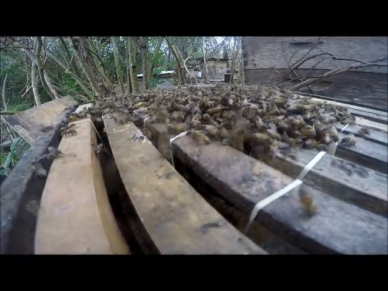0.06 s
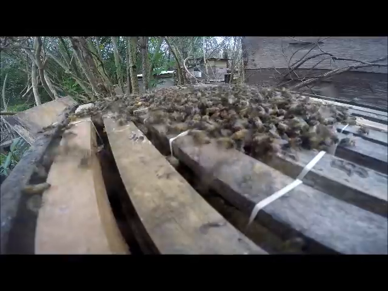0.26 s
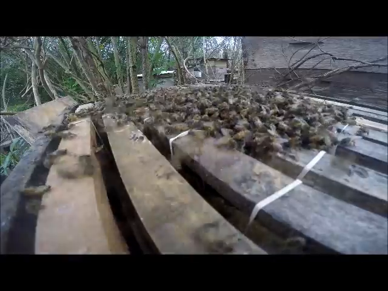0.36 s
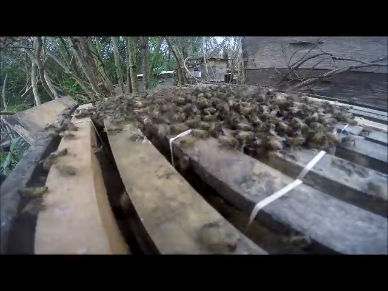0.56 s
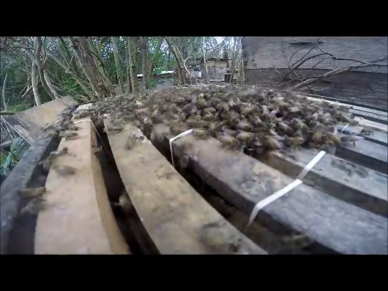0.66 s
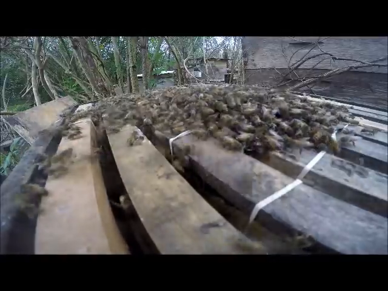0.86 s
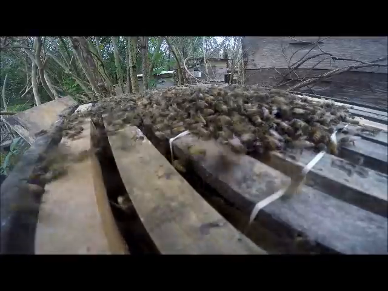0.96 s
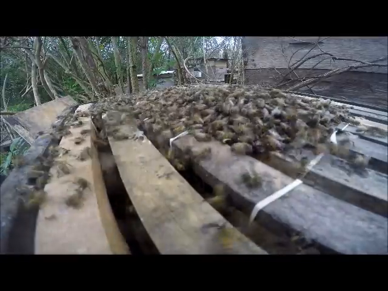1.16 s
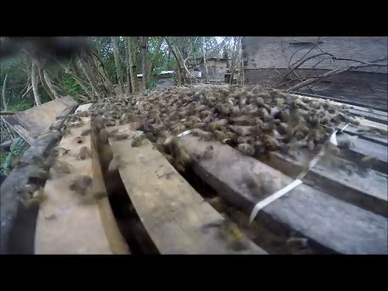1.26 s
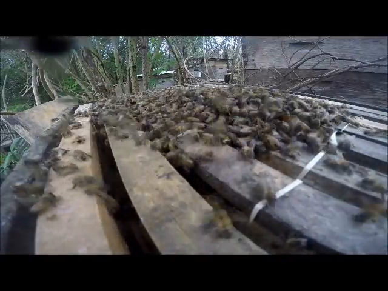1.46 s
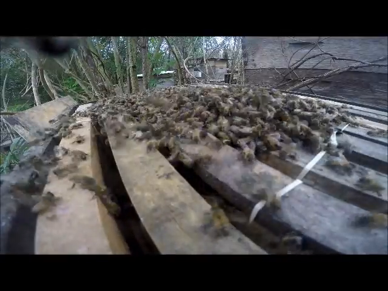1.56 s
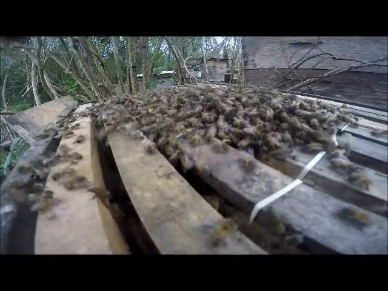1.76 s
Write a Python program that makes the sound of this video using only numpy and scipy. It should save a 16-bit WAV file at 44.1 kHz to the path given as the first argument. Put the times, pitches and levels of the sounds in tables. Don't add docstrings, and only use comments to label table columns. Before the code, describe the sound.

Rapid woody rattling of bees dumped on hive bars, with sharp cracks and low box thuds

```python
import sys
import numpy as np
from scipy import signal
from scipy.io import wavfile
from scipy.ndimage import uniform_filter1d

SR = 44100
rng = np.random.default_rng(int(sys.argv[2]) if len(sys.argv) > 2 else 0)


def store_pcm(level_fs):
    pcm = np.round(np.clip(level_fs, -1, 1) * 32767).astype(np.int16)
    wavfile.write(sys.argv[1], SR, np.atleast_2d(pcm).T)


def undo_db(level):
    steps = np.asarray(level, float) / 20
    return 10 ** steps


N = 81585


def unit(x):
    return x / np.sqrt(np.mean(x ** 2))


def peak_unit(x):
    return x / np.abs(x).max()


def ring(x, hz, t60):
    pole = np.exp(2j * np.pi * hz / SR - np.log(1000) / (t60 * SR))
    return signal.lfilter([1], [1, -pole], x + 0j).imag


def soft(x, hz, t60):
    return ring(ring(x, hz, 0.36 * t60), hz, t60) * np.log(1000) / (0.2 * t60 * SR)


def band(x, lo_hz, hi_hz):
    sos = signal.butter(2, [lo_hz, min(hi_hz, 0.45 * SR)], "band", fs=SR, output="sos")
    return signal.sosfilt(sos, x)


def add(out, s, sound, db):
    i = int(s * SR)
    sound = sound[:N - i]
    out[i:i + len(sound)] += undo_db(db) * peak_unit(sound)


def walk(rate):
    hold = int(SR / rate)
    levels = np.repeat(rng.standard_normal(N // hold + 1), hold)
    return 1.48 * uniform_filter1d(uniform_filter1d(levels, hold), hold)[:N]


# (time [s], level [dB], low bar mode [Hz], high bar mode [Hz], high re low modes [dB])
KNOCKS = [(0.055, -17, 840, 1720, -15), (0.18, -25, 500, 1680, -16), (0.204, -7.5, 884, 1960, -11),
          (0.219, -20.5, 957, 1670, -18), (0.269, -8, 899, 1970, -18),
          (0.308, -13.5, 815, 2400, -11.5), (0.347, -12, 1330, 2480, -10),
          (0.355, -12.5, 906, 1960, -0.5), (0.41, -28, 844, 1900, -6), (0.433, -8.5, 727, 2500, -9),
          (0.464, -14.5, 1194, 1825, -3), (0.513, -16, 766, 2910, -6), (0.528, -11, 880, 1990, -7),
          (0.5945, -12, 916, 1900, 7.5), (0.638, -24, 567, 3020, -15), (0.669, -39, 1270, 2010, 9),
          (0.759, -18, 910, 1540, -11.5), (0.787, -17, 853, 1730, -27),
          (0.835, -17, 847, 2510, -10.5), (0.844, -10.5, 858, 1710, -14),
                 (0.855, -24, 900, 2070, -6), (0.873, -4, 921, 1890, -16), (0.892, -21.5, 836, 2000, -4.5),
                 (0.925, -6.5, 850, 2470, -9.5), (0.931, -4, 649, 1650, -39),
                 (0.951, -15.5, 940, 2610, -10), (0.969, -18, 924, 1960, -12),
                 (1.042, -15.5, 862, 2380, -8.5), (1.05, -17.5, 713, 2450, -9),
                 (1.0765, -8, 720, 2510, -15), (1.086, -5, 820, 1690, -18),
                 (1.095, -12.5, 817, 2440, -13.5), (1.125, -17.5, 930, 1750, -3.5),
                 (1.151, -8, 733, 2000, -11), (1.164, -5, 858, 1907, -14.5), (1.171, -6.5, 892, 1980, -6),
          (1.203, -8.5, 1310, 1810, -2.5), (1.2248, -17, 1088, 1860, 1.5),
               (1.2417, -7.5, 910, 1870, -22), (1.263, -8.5, 947, 2370, -6), (1.307, -13, 888, 1780, -6),
               (1.327, -22, 855, 2770, -11), (1.345, -15, 820, 2085, -5), (1.358, -13, 754, 1960, -3.5),
               (1.398, -24.5, 930, 1760, 3), (1.418, -8.5, 929, 2460, -11.5), (1.617, -19.5, 904, 2020, -6),
               (1.658, -38.5, 790, 1850, 9), (1.678, -23.5, 930, 2600, -7.5),
               (1.737, -27.5, 980, 2420, -10),
          (1.539, -15, 1000, 2980, -8),
    (1.554, -15, 880, 1950, -16),
]
# (time [s], level [dB], mode [Hz], t60 [s])
LOOSE_BAR = (1.5638, -1, 692, .05)
# (frequency [Hz], level [dB], t60 [s])
BARS = [(579, -7, 0.092), (722, -13.5, 0.033), (752, -1.5, 0.016), (867, 3, 0.031), (1004, -14, 0.12),
        (1232, -1.5, 0.034), (1650, -10, 0.03), (1960, -11.5, 0.035), (2460, -9, 0.023),
        (3009, -8.5, 0.019), (3834, -14.5, 0.015), (4236, -24.5, 0.031), (4796, -23, 0.026),
        (6440, -34, 0.018)]


def knocks():
    low_t60_s, high_t60_s, usual_contact_ms = 0.033, 0.026, 2.36
    other_modes_db, other_high_db, scatter_db, knock_db = -7.5, 8, 4, -1.3
    out, t = np.zeros(N), np.arange(4096) / SR
    for s, db, low_hz, high_hz, high_db in KNOCKS:
        contact_ms = usual_contact_ms * undo_db(-0.3 * np.clip(high_db + 14, -10, 15))
        push = rng.standard_normal(len(t)) * t * np.exp(-t * 2000 / contact_ms)
        other_low = other_high = 0
        for hz, mode_db, t60 in BARS:
            gain = undo_db(other_modes_db + mode_db + scatter_db * rng.standard_normal())
            mode = gain * peak_unit(soft(push, hz, t60 / 2))
            if hz < 1500:
                other_low = other_low + mode
            else:
                other_high = other_high + mode
        impulse = 1.0 * (t == t[20])
        low = peak_unit(soft(impulse, low_hz, low_t60_s)) + other_low
        high_ring_s = high_t60_s * np.sqrt(contact_ms / usual_contact_ms)
        high = peak_unit(soft(push, high_hz, high_ring_s)) + undo_db(other_high_db) * other_high
        add(out, s - 0.001, low, db + knock_db)
        add(out, s - 0.001, high, db + knock_db + high_db + 1.5)
    s, db, hz, t60 = LOOSE_BAR
    add(out, s, band(ring(1.0 * (t == 0), hz, t60), hz / 2, hz * 2), db)
    return out


# (time [s], level [dB], mode [Hz], t60 [ms])
SNAPS = [(.056, -25.5, 666, 35), (.058, -39.5, 2380, 18), (.4365, -22, 824, 90), (1.021, -19.5, 1250, 26),
         (1.05, -21, 1260, 12), (1.076, -14, 1180, 14), (1.327, -17, 853, 23), (1.432, -16.5, 890, 14.4),
         (0.5475, -6.5, 2300, 3.8), (0.5936, -15.5, 3050, 17), (.603, -26, 1930, 27),
         (.5945, -26.5, 4630, 6.2), (0.5986, -26, 990, 41), (.7154, -36.5, 2440, 16),
         (.855, -26.5, 3000, 15), (.864, -19, 850, 22), (0.874, -25, 2950, 15), (.873, -32, 1290, 22),
         (.932, -9.5, 884, 20), (.938, -15, 1230, 27), (0.9812, -31, 1170, 10), (0.992, -3.5, 1250, 5.5),
         (0.991, -16.5, 5530, 8), (.993, -20.5, 2480, 14.5), (1.0178, -25, 1790, 15),
         (1.0222, -23, 2380, 15), (1.2054, -18, 1490, 6.5), (1.2132, -8, 1520, 4.4),
         (1.2216, 0.5, 1650, 6.1), (1.2232, -11, 6460, 3.4), (1.2035, -15.5, 6950, 4.4),
         (1.209, -16, 1890, 12), (1.2662, -8.5, 983, 13.6), (1.4878, -7, 2170, 1.7),
         (1.4895, -3.5, 4630, 4.1), (1.4912, -13, 1230, 28), (1.4915, -11.5, 6780, 5),
         (1.5216, -32, 1610, 15), (1.5641, -9, 4010, 4.4), (1.5645, -9, 1035, 16), (.158, -39, 2020, 9.9),
         (0.4825, -18.5, 2980, 12), (.687, -30, 1230, 25)]
BODY_SNAPS = [
    (1.4885, -16, 360, 25),
    (1.496, -31, 4480, 22),
    (1.567, -32, 5500, 16),
]


def snaps(rows):
    out, tap = np.zeros(N), 1.0 * (np.arange(4096) == 0)
    for s, db, hz, t60_ms in rows:
        add(out, s, soft(tap, hz, t60_ms / 1000), db)
    return out


# (time [s], treble level [dB], 2-6 kHz body re treble [dB], 0.7-2 kHz re treble [dB], fade [ms])
CRACKS = [(0.546, -36, 22, 18, 2.1), (0.992, -27, 15.5, 13.5, 1.0), (1.2130, -32.5, 19.5, 14, 1.7),
          (1.223, -14.5, 12, 8, 2), (1.564, -22.5, 14, 3, 1.6), (.1235, -39, -11, -18, 1.1),
          (0.8095, -24.5, -3, -5.5, 0.78), (1.1186, -22, 2.5, -1, 0.64), (1.2030, -15, -1, -5, 1.3),
          (1.2635, -26.5, 11.5, 9, 0.94), (1.266, -27, 9, 20, 1.6), (1.3019, -35.5, 10, 14, 1.7),
          (1.4112, -41, 13.5, 6, 1.9), (1.4875, -29.5, 15, 14, 0.51), (1.491, -7.5, 9.5, 1, 1.26),
          (1.8292, -42, 2.5, -10, 1.1), (.9828, -38, -4, -6, .8), (1.4857, -46, 20, -3, 1.1),
          (0.5523, -40, 14, 22, 1.4), (1.635, -47, 0, 5, 2)]
# (low, middle, high, top [Hz])
CRACK_EDGES_HZ = (700, 2200, 5800, 13500)


def cracks():
    out, t = np.zeros(N), np.arange(2048) / SR
    low, mid, high, top = CRACK_EDGES_HZ
    for s, db, body_db, low_db, fade_ms in CRACKS:
        envelope = np.exp(-t * 1000 / fade_ms) * (1 - np.exp(-t / 0.0001))
        tick = 1.5 * (t == t[9])
        burst = rng.standard_normal(len(t)) * envelope + tick
        add(out, s, band(burst, high, top), db)
        add(out, s, band(band(burst, mid, high), mid, high), db + body_db)
        add(out, s, band(band(burst, low, mid), low, mid), db + low_db)
    return out


# (time [s], level [dB])
THUMPS = [(0.2, -14), (0.264, -20.5), (0.314, -16), (0.462, -25), (0.491, -20), (0.863, -36), (0.868, -14),
          (1.031, -18.5), (1.147, -41), (1.148, -14.5), (1.235, -15), (1.351, -16), (1.526, -19.5),
          (1.614, -21.5)]
# (frequency [Hz], t60 [s])
BOX = [(45, 0.14), (80, 0.29), (143, 0.09), (205, 0.043), (305, 0.054)]
BOX_DB = [-3.5, -5.5, -6.5, -5.5, -10]


def thumps():
    push_ms, thump_db = 6.5, 1.5
    out, t = np.zeros(N), np.arange(8192) / SR
    push = t * np.exp(-t * 2000 / push_ms)
    for s, db in THUMPS:
        thump = 0
        for (hz, t60), mode_db in zip(BOX, BOX_DB):
            level_chance, pitch_chance = rng.standard_normal(2)
            mode = soft(push, hz * (1 + 0.15 * pitch_chance), t60)
            thump = thump + undo_db(mode_db + 2 * level_chance) * unit(mode)
        add(out, s, thump, db + thump_db)
    return out


# (time [s], level [dB], length [ms], thin treble re level [dB])
SCRAPES = [
    (0.309, -31.5, 29.5, -43),
    (0.344, -41, 13, -40),
    (0.471, -25.5, 21.8, -41),
    (0.488, -20.5, 23.3, -34),
    (.92, -41, 25, -36),
    (1.012, -23, 29.4, -42),
    (1.148, -33.5, 50, -38),
    (1.535, -24.5, 18.3, -37),
    (1.205, -29, 18.3, -22),
]


def scrapes():
    t = np.arange(N) / SR
    grit = rng.standard_normal(N) * undo_db(2.5 * walk(600))
    shape = thin = 0
    for s, db, ms, treble_db in SCRAPES:
        swell = np.sin(np.pi * np.clip((t - s) * 1000 / ms, 0, 1)) ** 2
        shape = shape + undo_db(db) * swell
        thin = thin + undo_db(db + treble_db) * swell
    wood = sum(undo_db(0.5 * db) * ring(grit * shape, hz, 0.5 * t60) for hz, db, t60 in BARS)
    return wood / 10 + band(grit * thin, 3900, 9100) * 10


# (time [s], level [dB])
PATTER = [(0, -46.5), (0.171, -51.5), (.23, -45.5), (.39, -38), (.5, -31), (.62, -39.5), (0.791, -43.5),
          (0.861, -27.5), (1.0, -33), (1.18, -30), (1.29, -34), (1.43, -34.5), (1.5, -33), (1.661, -39.5),
          (1.721, -49), (1.85, -56.5)]


def patter():
    taps_per_s, spread_db, flurry_db, patter_db, rumble_db = 800, 2, 4.5, 3, 0.5
    level = undo_db(np.interp(np.arange(N) / SR, *np.transpose(PATTER)))
    at = np.flatnonzero(rng.random(N) < taps_per_s / SR)
    tap_db = spread_db * np.minimum(rng.exponential(size=len(at)), 2)
    size = undo_db(tap_db + flurry_db * np.clip(walk(60)[at], -2, 1))
    bars = rumble = 0
    for hz, db, t60 in BARS:
        taps = np.zeros(N)
        taps[at] = size * rng.standard_normal(len(at))
        bars = bars + undo_db(db) * soft(taps, hz, t60 / 2)
    for (hz, t60), db in zip(BOX, BOX_DB):
        mode = unit(soft(rng.standard_normal(N), hz, t60))
        rumble = rumble + undo_db(db + 2.2 * walk(13.52)) * mode
    return level * undo_db(patter_db) * unit(bars), level * undo_db(rumble_db) * unit(rumble)


# (frequency [Hz], density [dB per Hz])
AIR = [(12, -34), (20, 19.5), (65, 5), (427, -13.5), (871, -14), (1470, -51), (3000, -24.5), (3900, -54),
       (6600, -120)]


def air():
    out, (air_hz, air_db) = 0, np.transpose(AIR)
    for hz in 22 * 2 ** np.arange(0, 7.1, 0.5):
        density_db = np.interp(np.log(hz), np.log(air_hz), air_db)
        db = density_db + 10 * np.log10(hz) + 0.9 * walk(5.65)
        out = out + undo_db(db) * unit(band(rng.standard_normal(N), hz / 1.62, hz * 1.24))
    return unit(out) * undo_db(-39.5)


def hiss():
    hiss_db, duck_s, duck_db = -57, 1.57, -7.5
    middle = unit(band(rng.standard_normal(N), 3600, 6300))
    port = undo_db(-6) * unit(soft(rng.standard_normal(N), 6840, 0.0075))
    treble = undo_db(-2.5) * unit(band(rng.standard_normal(N), 7000, 21000))
    duck = np.clip((np.arange(N) / SR - duck_s) / 0.0055, 0, 1)
    return (middle + port + treble) * undo_db(hiss_db + duck_db * duck)


def scene():
    taps, rumble = patter()
    wood = knocks() + snaps(SNAPS) + scrapes() + taps
    bars = signal.sosfilt(signal.butter(4, 480, "high", fs=SR, output="sos"), wood)
    box = band(thumps() + rumble, 51.4, 620)
    return (bars + cracks() + snaps(BODY_SNAPS) + box + air())[None]


def roll_off(x):
    return signal.sosfilt(signal.butter(12, 16510, fs=SR, output="sos"), x)


def record(dry):
    limited = np.clip(dry + hiss(), -1, 1)
    top_cut = signal.ellip(8, 0.2, 55, 15350, fs=SR, output="sos")
    mix = np.clip(signal.sosfilt(top_cut, limited), -1, 1)
    return roll_off(mix)


dry = scene()
out = record(dry)
store_pcm(out)
```